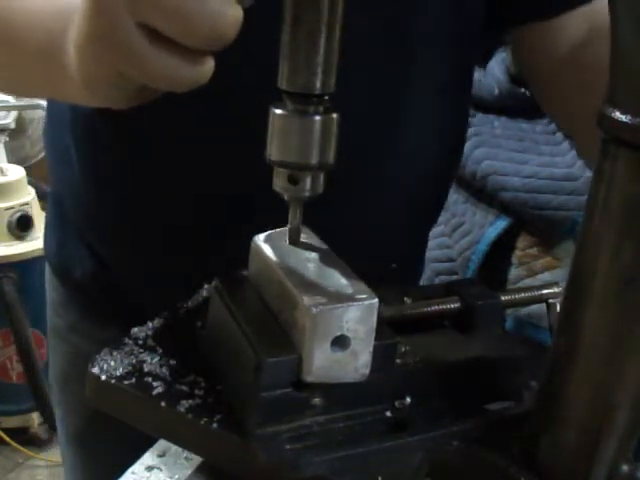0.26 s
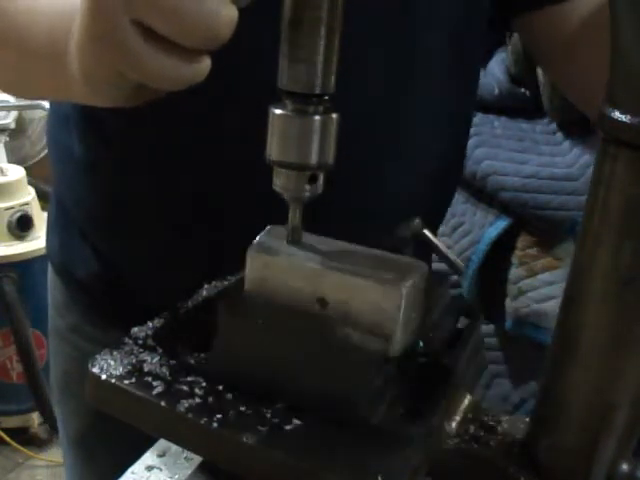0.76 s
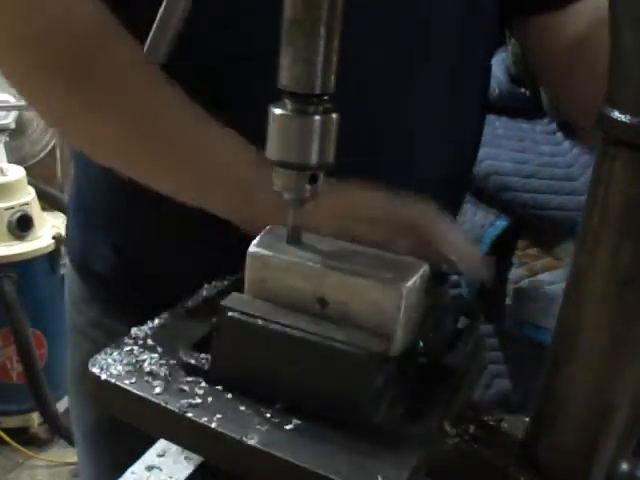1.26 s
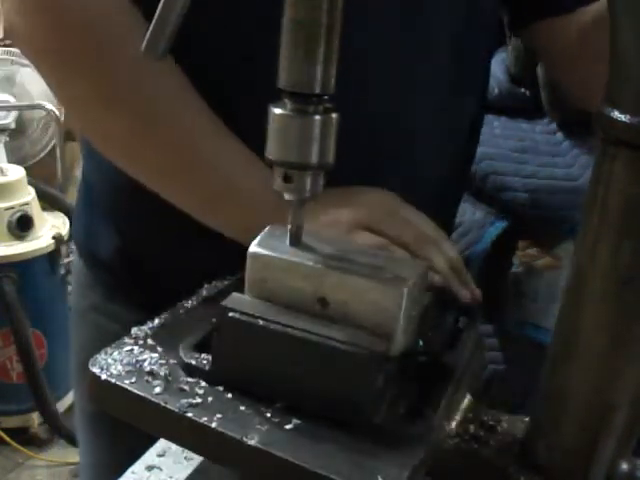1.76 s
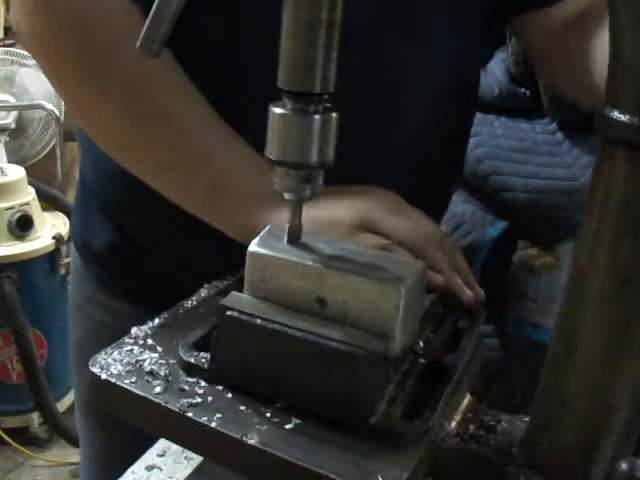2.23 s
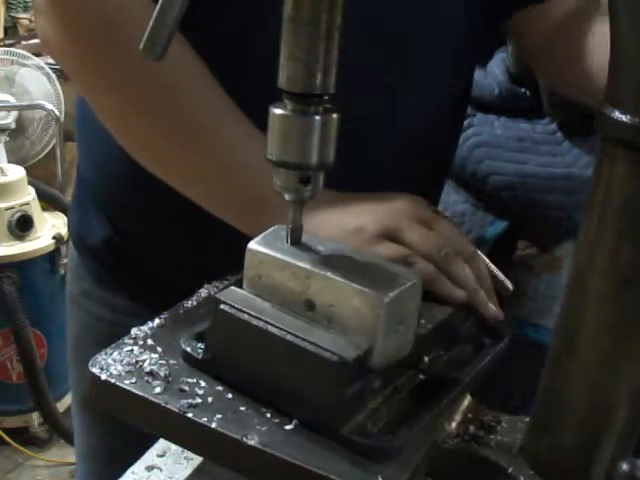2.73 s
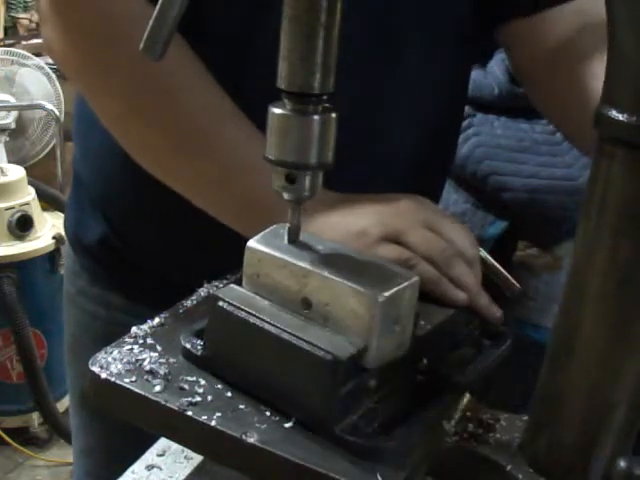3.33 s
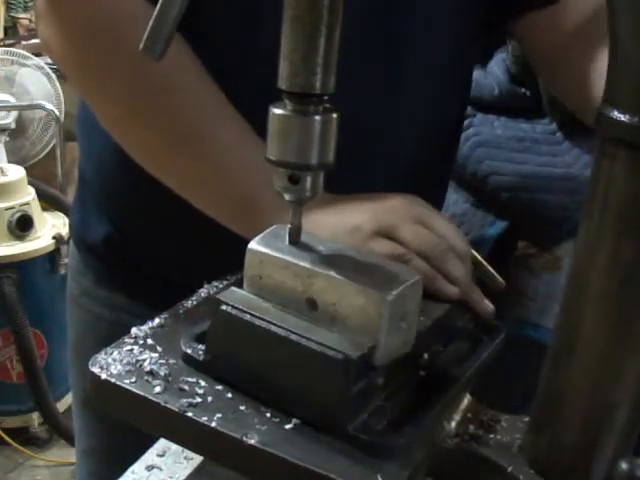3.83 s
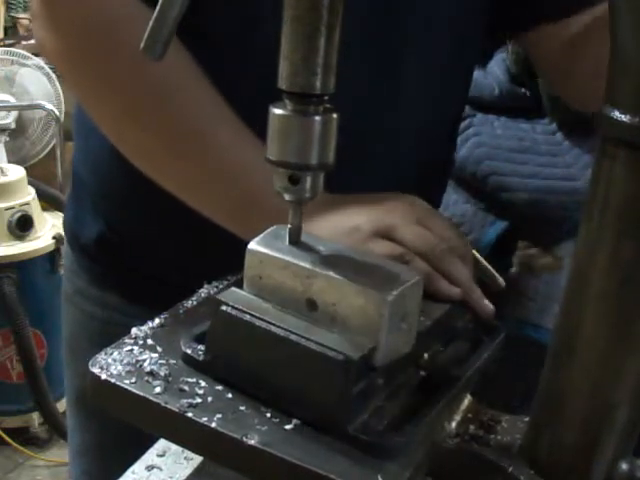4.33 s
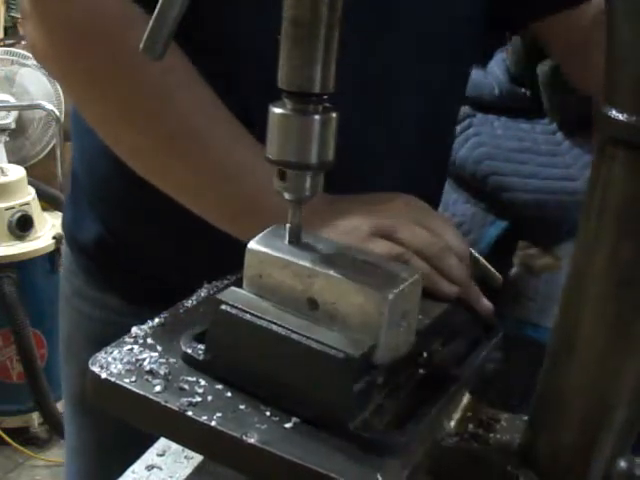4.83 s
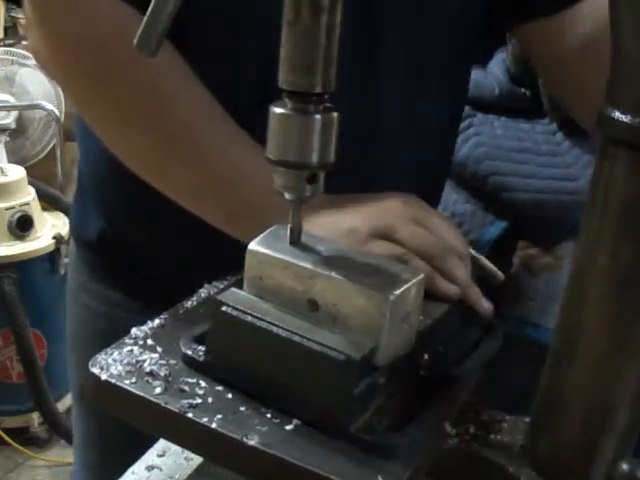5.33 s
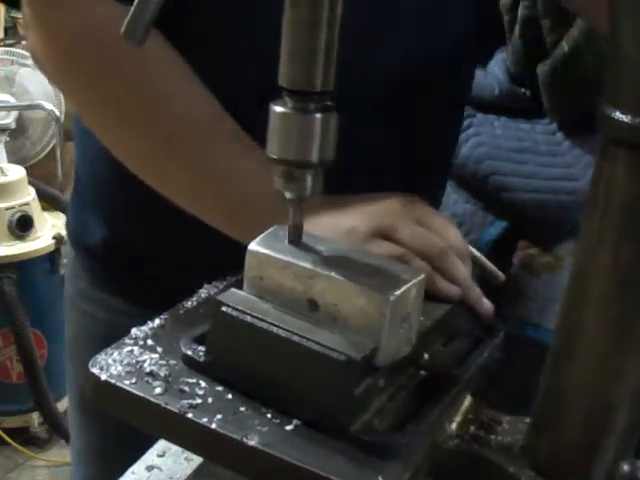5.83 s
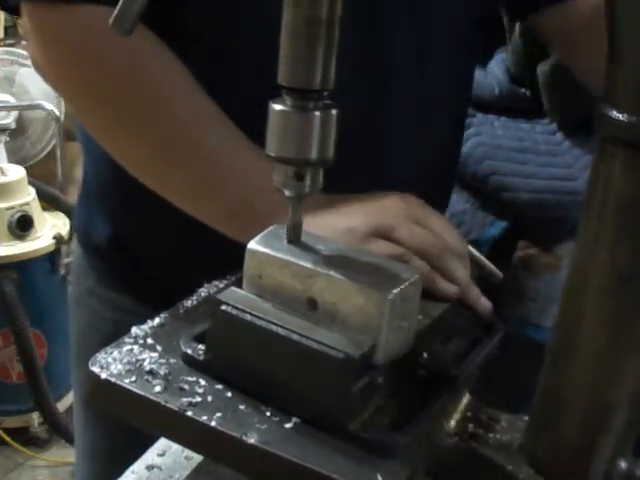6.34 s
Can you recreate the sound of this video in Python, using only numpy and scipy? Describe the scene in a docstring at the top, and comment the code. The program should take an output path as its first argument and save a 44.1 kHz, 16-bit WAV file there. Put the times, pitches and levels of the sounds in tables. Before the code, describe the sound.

A thread tap cuts into a metal block in four short hand-turned pulls, one early and three near the end, each a quick run of dry clicks over a rough rub and a thin ring. Before and between them a vise slides on an iron table, the drill press knocks, and a few chips snap. The sound is close, with a short workshop echo, soft room hiss and a faint high ticking.

```python
"""A thread tap in a drill press, turned by hand into a metal block, close to one microphone.
Each pull makes the drive chatter notch by notch over the rub of the cut, and the tap sings thinly.
Knocks sound at the machine, the vise slides and scuffs on the iron table, and chips snap.
Behind it lies a quiet workshop, with a short echo and soft hiss as the hands shift.
A faint high tick, about sixty a second, runs under everything."""
import sys
import numpy as np
from scipy import signal
from scipy.io import wavfile
from scipy.ndimage import uniform_filter1d

SR = 44100
rng = np.random.default_rng(int(sys.argv[2]) if len(sys.argv) > 2 else 0)


def store_pcm(level_fs):
    """Save levels as 16-bit WAV."""
    pcm = np.round(np.clip(level_fs, -1, 1) * 32767).astype(np.int16)
    wavfile.write(sys.argv[1], SR, np.atleast_2d(pcm).T)


N = 290610

# The force of the cut, one table a pull. Each row: time in seconds, level of the press column in dB,
# middle and treble in dB against it.
PULL_LEVELS = [
    [(1.69, -69, 4, 6), (1.7, -56, -2, -15), (1.72, -49, -6, -26), (1.734, -45, -3, -11),
     (1.746, -42, -15, -13.5), (1.834, -41, -5, -12), (1.838, -38, -7, -8), (1.95, -38, -3.5, -16),
     (1.966, -39, -4, -22), (1.982, -43.5, -6, -16), (2.008, -41.5, -6, -19), (2.016, -39.5, -21, -26),
     (2.042, -59, -9, -27), (2.06, -61, 0, -23)],
    [(4.675, -51, -1, -18), (4.699, -40, -11, -13), (4.741, -57, 7, -6), (4.759, -41, -5, -14),
     (4.773, -54, -8, 0), (4.779, -40, -5.5, -13), (4.885, -38, -7.5, -10), (4.961, -40.5, -2.5, -15),
     (4.985, -33.5, -6, -13), (4.995, -45.5, 5, 1), (5.015, -35.5, -8.5, -22), (5.163, -38.5, -8.5, -21),
     (5.191, -39, -21, -24), (5.197, -59, -12, -10), (5.207, -44, -5, -25), (5.245, -53, 9, 3),
     (5.251, -64, -8, -8), (5.27, -67, 25, 5)],
    [(5.5, -25, -12, -14), (5.512, -43, -3, -11), (5.53, -40.5, -12, -17), (5.548, -52, -8, -20),
     (5.556, -42, -5, -14.5), (5.75, -31.5, -1, -6.5), (5.768, -24.5, -5, -15), (5.796, -37, -5, -13),
     (5.812, -24, -13, -25), (5.838, -34.5, -2.5, -11), (5.848, -40, 4, -9), (5.858, -32, -11, -22),
     (5.884, -29, 0.5, -12), (5.892, -24.5, -4, -18.5), (5.952, -32.5, -5.5, -23), (5.958, -33.5, 4, -11.5),
     (5.976, -27.5, -5, -20), (6.012, -31.5, -7, -18), (6.038, -28.5, -11, -33), (6.104, -41.5, -16, -31),
     (6.118, -42.5, -5.5, -18), (6.182, -46, -14, -30), (6.224, -43, -5.5, -8), (6.258, -50, -20, -33),
     (6.268, -36, -16, -29), (6.31, -70, -18, -29)],
    [(6.322, -54, -8, -12), (6.34, -37, -20, -24), (6.354, -46, -3, -17), (6.386, -33.5, -10, -29),
     (6.438, -27.5, -11.5, -24.5), (6.456, -33.5, 3, -7.5), (6.492, -26.5, -9.5, -22),
     (6.496, -29.5, 1, -8.5), (6.56, -30, 3, -3), (6.59, -32, 0, -17)],
]
# How the cut bites. Each row: time in seconds, favoured ring of column, middle and treble in Hz,
# crispness of the notches from 0 to 1.
CUT_BITE = [(1.73, 950, 1900, 4000, .75), (1.8, 950, 3000, 5200, .75), (1.87, 880, 3300, 4100, .8),
            (1.9, 850, 2400, 5300, .7), (1.94, 950, 2700, 4200, .75), (2.02, 880, 3100, 4000, .6),
            (4.72, 620, 2900, 4100, .3), (4.82, 700, 2900, 4000, .35), (4.9, 780, 2200, 4300, .35),
            (4.935, 800, 3100, 5200, .7), (5.0, 850, 3200, 4600, .85), (5.2, 850, 3200, 4400, .95),
            (5.55, 830, 2100, 4100, .5), (5.66, 850, 2000, 4100, .7), (5.74, 900, 2400, 4300, .8),
            (5.79, 820, 3000, 4200, .7), (5.915, 900, 3000, 4100, .85), (5.935, 830, 2250, 4000, .8),
            (6.05, 820, 2100, 4000, .7), (6.2, 820, 2900, 4200, .5), (6.36, 810, 2300, 4300, .35),
            (6.45, 810, 2300, 4800, .55), (6.5, 900, 2300, 4300, .75), (6.515, 950, 3250, 4300, .8),
            (6.54, 1030, 3250, 4300, .8), (6.55, 1040, 2300, 4300, .8)]
# The favoured rings of column, middle and treble. Each row: width in Hz, level in dB against the rest.
FAVOURED_RINGS = [(130, -2.), (450, -1.), (550, -3.)]


def pulls(press):
    """The cut jolts and rubs the press in five zones of pitch: rumble, column, middle, treble, top."""
    t = np.arange(N) / SR
    column_hz, middle_hz, treble_hz, crispness = curves(CUT_BITE)
    jolts = notch_jolts(press)
    jolts[2] = favour(jolts[2], middle_hz, *FAVOURED_RINGS[1])
    jolts[3] = favour(jolts[3], treble_hz, *FAVOURED_RINGS[2])
    # the jolts' share of the power: the lower zones follow the bite, the upper two are mostly notches
    share = np.r_[np.outer([.5, .85, 1.05], crispness), np.outer([.8, .65], np.ones(N))].clip(0, .95)
    rubbing = rub(press, slips_per_s=3000, spread_db=2.8, shifts_per_s=9)
    zones = np.sqrt(share) * jolts + np.sqrt(1 - share) * rubbing
    zones[1] = favour(zones[1], column_hz, *FAVOURED_RINGS[0])  # rings with rub and jolts alike
    column, middle, treble = curves(np.concatenate(PULL_LEVELS))
    rumble_db = -45 + 0.52 * (column + 40)
    top_db = -66 + 0.84 * (column + treble + 50)
    gains = gain_of([rumble_db, column, column + middle, column + treble, top_db])
    fade = sum(gate(rows[0][0], rows[-1][0] + 0.02, t, fade_s=0.01) for rows in PULL_LEVELS)
    return fade * ((gains * zones).sum(0) + tap_ring(zones[3]))


# How far the drive has turned, one table a pull. Each row: time in seconds, notches passed.
DRIVE_TURN = [
    [(1.705, -1), (1.736, 0), (1.783, 2), (1.821, 4), (1.89, 8), (1.962, 12), (2.013, 14)],
    [(4.752, 0), (4.797, 2), (4.85, 5), (4.936, 11), (5.024, 17), (5.08, 20), (5.127, 22), (5.159, 23),
     (5.198, 24)],
    [(5.551, 0), (5.619, 3), (5.665, 6), (5.722, 11), (5.806, 20), (5.875, 27), (5.934, 32), (6.015, 38),
     (6.068, 41), (6.139, 44)],
    [(6.359, 0), (6.399, 2), (6.443, 5), (6.499, 10), (6.542, 15), (6.586, 20)],
]
# The click of a notch in middle and treble. Each row: lower and upper band edge in Hz.
CLICK_BANDS = [
    [1500, 3500],
    [3500, 5500],
]


def notch_jolts(press):
    """Each passing notch jolts the press: a dry click within a short grind of contacts."""
    starts, t = [], np.arange(4096) / SR
    for rows in DRIVE_TURN:
        s, passed = np.transpose(rows)
        starts.extend(np.interp(np.arange(passed[0], passed[-1] + 1), passed, s))
    rings = blows(press, spread_db=1.7, count=len(starts))
    rings *= np.exp(-np.outer([5, 18, 46, 86, 170], t))  # the grip damps them
    grind = rng.standard_normal((len(starts), 1, 500)) * np.exp(-t[:500] / .0018)
    rings[:, 2:, :2048] = peaked(signal.fftconvolve(rings[:, 2:, :1549], grind ** 3, axes=2))
    rings[:, 2:, 2048:] = 0
    for k, edges_hz in enumerate(CLICK_BANDS, start=2):
        band = signal.butter(4, edges_hz, "bandpass", fs=SR, output="sos")
        rings[:, k] += gain_of(-4) * peaked(signal.sosfilt(band, signal.unit_impulse(4096, 50)))
    jolts = np.zeros((5, N))
    sizes = gain_of(1.4 * rng.standard_normal((len(starts), 5)))  # nearly even
    for start, ring, size in zip(starts, rings, sizes):
        for k in range(5):
            add(jolts[k], start - .0015, size[k] * ring[k])
    return jolts / np.sqrt(running_power(jolts) + 0.13)


# The thin ring of the tap, one table a pull. Each row: time in seconds, level in dB.
TAP_LEVELS = [
    [(1.72, -72), (1.738, -64), (1.76, -71), (1.868, -59), (1.99, -69), (2.04, -80)],
    [(4.72, -69), (4.904, -59), (4.97, -66), (4.984, -58), (5.162, -70), (5.22, -83)],
    [(5.56, -70), (5.696, -49), (5.752, -47), (5.794, -56), (5.986, -59), (6.1, -74)],
    [(6.38, -73), (6.42, -69), (6.454, -53), (6.474, -57), (6.564, -43), (6.59, -48)],
]


def tap_ring(drive):
    """The cut keeps one narrow mode of the tap singing."""
    ring = resonate(drive, hz=np.full(N, 4400), width_hz=16)
    db, = curves(np.concatenate(TAP_LEVELS))
    return gain_of(db) * ring / np.sqrt(running_power(ring))


# Clear modes of the press. Each row: pitch in Hz, width in Hz, relative strength in dB.
PRESS_MODES = [(91.8, 32, -14), (195.3, 40, -11), (249.6, 34.5, -8.5), (813, 120, 4.5), (1051, 47, 2.5),
               (629, 68, -1.5), (493, 182, 9.5), (1418, 37, -22), (1906, 100, -7.5), (2246, 62, -11.5),
               (2483, 93, -20), (2880, 147, -21), (3227, 150, -13), (3950, 160, -25), (10240, 38, -45)]
# Its many small modes. Each row: frequency in Hz, relative strength in dB.
PRESS_SMALL_MODES = [(35, -62), (60, -35), (242, -18), (400, -9.5), (543, 7), (800, -4), (1100, -0.5),
                     (1300, -7), (2900, -13), (3500, -24.5), (11000, -57), (14300, -85), (22000, -120)]


def drill_press():
    """The column and table of the press, which ring under both the cut and the knocks."""
    return metal_body(PRESS_MODES, PRESS_SMALL_MODES, borders_hz=[400, 1300, 3600, 6500],
                      small_db=-4.5, width_at_1khz=141, rise_cycles=3, count=140)


# Knocks at the machine, among them a few harder jolts of the drive's notches. Each row: start in seconds,
# column level in dB, rumble, middle and treble in dB against it, favoured ring in Hz, damping factor.
KNOCKS = [(0.0699, -37, -3.5, -6.5, 0, 3390, 1.07), (0.289, -30.5, -7.5, -6, -22, 1400, 0.62),
          (0.331, -36, -30, -25, -34, 1430, 2.3), (0.837, -38.5, -30, -0.5, -6, 2010, 0.74),
          (1.059, -57, -23, 11, 4.5, 2210, 1.1), (1.353, -31.5, -14.5, -10.5, -20, 1860, 0.73),
          (1.823, -34.5, -18, -14, -9, 2200, 3.8), (2.082, -27, -32, 6.5, 1.5, 3200, 1.2),
          (2.0985, -28.5, -22, 3.5, -2, 2500, 2.3), (2.1005, -30.5, -20, 13.5, -9, 2300, 1.74),
          (2.105, -32, -10, -1.5, -15, 1750, 0.61), (2.131, -49, -13, 0, -18, 2300, 2.5),
          (2.185, -41, -20, -14, -25, 1900, 1.6), (2.421, -40, -3, -8, 4, 3950, 2.6),
          (2.544, -34.5, -10.5, -6, -2, 2900, 1.2), (2.566, -35, -29, -1.5, -0.5, 2950, 0.65),
          (2.644, -29.5, -7.5, -3.5, -16, 2930, 0.86), (2.918, -32.5, -18, -17, -32, 1890, 1.6),
          (3.303, -47, -26, -3, -22.5, 2170, 0.98), (3.33, -45, -8, -13, -24, 1380, 1.3),
          (3.52, -42, -14, -20, -30, 1500, 1.3), (3.566, -27, -10.5, -3, -34, 1400, 0.34),
          (3.604, -33.5, -19, -18, -33, 1910, 2.6), (3.654, -34.5, -3.5, -7, -18, 2070, 1.1),
          (3.666, -42.5, -8, 2.5, -10, 2500, 0.91), (3.67, -31, -12, -6, -12, 2700, 3.8),
          (3.678, -38.5, -30, 3, -4, 2520, 1.3), (3.698, -53, -12, 12, 6, 2430, 1.9),
          (4.1394, -50, -3, 14, 15, 2900, 2.8), (4.286, -31, -16, -7.5, -42, 1470, 0.4),
          (4.32, -35.5, -14, -7, -18, 2320, 1.55), (4.65, -30, -25, -2.5, -16.5, 2060, 0.99),
          (4.9966, -49, 4.5, 11.5, 5, 3200, 1.6), (5.127, -37, -11, -9, -18, 3160, 1.4),
          (5.333, -39, -37, 5, -5, 1910, 0.4), (5.479, -31, -24, -5.5, -22, 2190, 1.9),
          (5.679, -30, -4.5, 3, -7, 2300, 1.6)]


def knocks(press):
    """Each knock is a short crunch of contacts that rings the press; clear modes linger."""
    out, t, rows = np.zeros(N), np.arange(4096) / SR, np.array(KNOCKS)
    favoured_hz, dampings = rows[:, 5:].T
    _, borders_hz, _ = press
    rings = blows(press, spread_db=2.5, count=len(rows))
    envelope = np.exp(-np.pi * 200 * t) - np.exp(-t / 0.00048)
    favoured = np.sin(2 * np.pi * np.outer(favoured_hz, t)) * envelope
    rings[np.arange(len(rows)), np.searchsorted(borders_hz, favoured_hz)] += peaked(favoured)
    rings = peaked(rings)
    for zone, mode, db in [(0, 1, -1), (1, 3, 4.5)]:  # every blow finds the main modes of table and column
        hz, width_hz, _ = PRESS_MODES[mode]
        rise = 1 - np.exp(-t * hz / 1.6)
        rings[:, zone] += gain_of(db) * peaked(dying_sine(hz, width_hz, t) * rise)
    crunch = rng.standard_normal((len(rows), 400)) * (rng.random((len(rows), 400)) < .06)
    crunch[:, 0] = 1.32  # a firm first contact
    crunch *= np.exp(-np.outer(np.maximum(dampings, 1.1), t[:400]) / 0.0054)
    clear_hz = np.array([PRESS_MODES[k][0] for k in (7, 8, 10, 11)])
    for (s, db, rumble, middle, treble, hz, damping), ring, contacts in zip(rows, rings, crunch):
        decay = np.exp(-np.outer([3.3, 67, 960, 1500, 61], t) * np.clip(damping - .6, .25, 8))
        gains = gain_of(db + np.array([rumble, 0, middle, treble, treble - 16.5]))
        zones = gains[:, None] * peaked(signal.oaconvolve(ring * decay, contacts[None], axes=1))
        add(out, s - .001, zones[1:].sum(0))
        add(out, s + 0.00612, zones[0])  # the heavy table answers late
        octaves_away = abs(np.log2(clear_hz / hz))
        linger = gain_of(-11 * octaves_away) @ dying_sine(clear_hz[:, None], 47 * damping, t)
        add(out, s, gain_of(db + middle - 7) * linger * np.minimum(t / 0.0027, 1))
    return out


# Clear modes of the vise. Each row: pitch in Hz, width in Hz, relative strength in dB.
VISE_MODES = [(198, 80, -1), (358, 28, -14.5), (747, 210, 1), (1400, 200, -1), (1910, 110, -19),
              (2300, 240, 2), (2750, 110, -2.5), (3390, 95, -12), (3740, 54, -12), (4900, 62, -22),
              (5630, 44, -17), (6640, 61, -16), (7830, 210, -29)]
# Its many small modes. Each row: frequency in Hz, relative strength in dB.
VISE_SMALL_MODES = [(35, -60), (60, -39), (351, -18.5), (456, -16.5), (753, -11.5), (1390, -4), (2550, -18),
                    (2780, -1), (3240, -12), (4800, -13), (6500, -28.5), (9000, -33.5), (11000, -52),
                    (14300, -73), (22000, -120)]


def vise_body():
    """The metal of the vise, which rings when it is rubbed."""
    return metal_body(VISE_MODES, VISE_SMALL_MODES, borders_hz=[400, 1050, 2000, 4000],
                      small_db=-2.7, width_at_1khz=192, rise_cycles=2.5, count=180)


# The vise on the move, one table a slide. Each row: time in seconds, strength in dB, brightness in dB.
VISE_SLIDES = [
    [(0.4, -48, -14), (0.454, -44.5, 3), (0.52, -36, 1.5), (0.6, -24.5, -6.5), (0.636, -24.5, -2.5),
     (0.648, -19, -3), (0.7, -25.5, -5.5), (0.745, -32.5, -7), (0.775, -55, 1), (0.81, -64, -10)],
    [(1.4, -51, -6), (1.404, -41, -1), (1.422, -36.5, -11), (1.434, -44.5, -1), (1.448, -45.5, -7),
     (1.49, -60, 2)],
    [(2.14, -47, -2), (2.166, -51, 8), (2.298, -40.5, -4.5), (2.346, -36.5, -1), (2.474, -39.5, 1.5),
     (2.496, -35, -6), (2.53, -50, -5)],
    [(3.27, -52, -10), (3.3, -43, -9), (3.345, -49.5, -1), (3.38, -85, -2)],
]
# How its zones answer, low to high. Each row: offset in dB, dB per dB of strength and of brightness.
SLIDE_RESPONSE = [(-12, 0.41, -0.026), (-3.5, 0.7, -0.51), (-3.5, 0.97, -0.0016), (-5, 0.93, 0.45),
                  (-14, 0.95, 0.53)]


def vise_slides(vise):
    """The vise scuffs over the iron table in tiny slips, silent between slides."""
    t, gains = np.arange(N) / SR, np.zeros((5, N))
    offset_db, follows, brightens = np.transpose(SLIDE_RESPONSE)[:, :, None]
    for rows in VISE_SLIDES:
        strength, brightness = curves(rows)
        db = offset_db - 40.5 + follows * (strength + 39.5) + brightens * brightness
        gains += gate(rows[0][0], rows[-1][0] + 0.0069, t, fade_s=0.04) * gain_of(db)
    return (gains * rub(vise, slips_per_s=2500, spread_db=1.5, shifts_per_s=16)).sum(0)


# Chips breaking at the cut. Each row: start in seconds, level in dB, pitch in Hz,
# cycles to die to about a third.
CHIP_SNAPS = [(0.0689, -21, 3800, .6), (0.0695, -12.5, 3600, 0.52), (2.42, -16.5, 4060, 1.8),
              (2.4211, -12.5, 6130, 0.53), (4.1383, -16.5, 3080, 1.2), (4.994, -29, 4800, 1.2),
              (5.8473, -14, 5500, 1.3), (5.8485, -25, 7000, 0.98)]


def chip_snaps():
    """A snapping chip is a hard pulse: a sine that starts at once and dies in a cycle or two."""
    out, t = np.zeros(N), np.arange(200) / SR
    for s, db, hz, cycles in CHIP_SNAPS:
        add(out, s, gain_of(db) * np.sin(2 * np.pi * hz * t) * np.exp(-t * hz / cycles))
    return out


# Hands shifting at the machine. Each row: peak time in seconds, peak in dB, rise and fall in dB a second.
HAND_SWELLS = [(0.074, -43.5, 225, 85), (.84, -56.5, 898, 51), (1.08, -58.5, 113, 58), (3.1, -53.5, 66, 55),
               (4.138, -47, 79, 119), (4.32, -57, 155, 150)]
# The colour of their hiss. Each row: frequency in Hz, relative level in dB.
HAND_COLOUR = [(150, -37), (700, 3.5), (2000, -4.5), (4500, -5.5), (7500, -12.5), (11000, -24)]
# Faint squeaks in it. Each row: start and length in seconds, pitch and width in Hz, level in dB.
HAND_SQUEAKS = [(0.054, 0.076, 2055, 40.4, -46.5), (2.202, 0.1, 6270, 60, -67),
                (4.009, 0.33, 2126, 50, -56.5), (4.233, 0.25, 2320, 95, -52.5)]


def hands():
    """Shifting hands make soft swells of broad noise, with narrow fuzzy squeaks."""
    t, gain = np.arange(N) / SR, np.zeros(N)
    for s, db, rise, fall in HAND_SWELLS:
        gain += gain_of(db + np.minimum(rise * (t - s), fall * (s - t)))
    out = gain * noise(HAND_COLOUR, patchy_db=4.4)
    for s, length, hz, width_hz, db in HAND_SQUEAKS:
        size = round(length * SR)
        pole = np.exp(-np.pi * width_hz / SR)
        drift = signal.lfilter([1], [1, -pole], rng.standard_normal((2, SR)))[:, -size:]
        tone = ((drift[0] + 1j * drift[1]) * np.exp(2j * np.pi * hz * t[:size])).real
        add(out, s, gain_of(db) * unit_rms(tone) * signal.windows.tukey(size, .6))
    return out


def ticking(db=-45, per_s=59.94):
    """A faint regular tick in the treble, every second one weaker, sizes uneven."""
    train, starts = np.zeros(N), np.arange(.0268, N / SR, 1 / per_s)
    uneven_db = 3 * rng.standard_normal(len(starts)) - 3.1 * (np.arange(len(starts)) % 2)
    train[(starts * SR).astype(int)] = gain_of(db + uneven_db)
    return np.convolve(train, dying_sine(hz=5040, width_hz=1070, t=np.arange(128) / SR))[:N]


def workshop_echo(x, t60_s):
    """The room returns sparse, dulled echoes of random sign that die away."""
    echoes = np.zeros(SR // 2)
    at = np.arange(200, len(echoes) - 20, 20)
    sizes = rng.choice([-1., 1.], len(at)) * gain_of(-60 * at / SR / t60_s)
    echoes[at + rng.integers(0, 20, len(at))] = sizes
    echoes = signal.lfilter([1], [1, -.6], echoes)
    return signal.oaconvolve(x, echoes / np.linalg.norm(echoes))[:N]


# The quiet workshop around the microphone. Each row: frequency in Hz, relative level in dB.
ROOM_COLOUR = [(15, -41), (25, -10.5), (153, -16), (178, -5.5), (364, -6), (403, -2), (446, -4.5),
               (591, -4), (1010, -9), (1090, -8.5), (2060, -11.5), (2230, -10.5), (2530, -13), (4790, -19),
               (11100, -33.5), (14400, -55), (22000, -120)]


def room_tone():
    """The room hisses softly behind the work."""
    return gain_of(-51.5) * noise(ROOM_COLOUR, patchy_db=1.58)


def metal_body(clear, small, borders_hz, small_db, width_at_1khz, rise_cycles, count):
    """A metal part: its modes as dying complex tones, the borders of its zones, the zone of each mode."""
    small_hz = np.geomspace(120, 11000, count) * rng.uniform(0.99, 1.03, count)
    hz, width, db = np.transpose(clear)
    hz = np.r_[hz, small_hz]
    db = np.r_[db, spectrum_at(small, small_hz) + small_db]
    width = np.r_[width, width_at_1khz * np.sqrt(small_hz / 1000)]  # high modes lose energy faster
    t = np.arange(4096) / SR
    tones = np.exp(np.outer(2j * np.pi * hz - np.pi * width, t))
    rise = (1 - np.exp(-np.outer(hz, t) / rise_cycles)) ** 2  # low modes take longer to build up
    return (gain_of(db) * width)[:, None] * tones * rise, borders_hz, np.searchsorted(borders_hz, hz)


def blows(part, spread_db, count):
    """One ring a blow and zone: each blow meets the modes with its own strengths and phases."""
    tones, _, zone = part
    chance = rng.standard_normal((count, 2, len(zone)))
    weight = gain_of(spread_db * chance[:, 0]) * np.exp(2j * np.pi * chance[:, 1])
    rings = [(weight[:, zone == k] @ tones[zone == k]).real for k in range(5)]
    return peaked(np.stack(rings, axis=1))


def rub(part, slips_per_s, spread_db, shifts_per_s, spots=6):
    """Tiny uneven slips ring the part; the contact wanders, so the colour shifts. Zones of rms 1."""
    rings = blows(part, spread_db, count=spots)
    slips = np.minimum(rng.exponential(1, N), 5) * (rng.random(N) < slips_per_s / SR)
    slips *= rng.choice([-1, 1], N)
    place = np.arange(N) / SR * shifts_per_s % spots
    apart = (place - np.arange(spots)[:, None] + 1) % spots - 1
    slips = slips * np.cos(np.pi / 2 * np.clip(apart, -1, 1))  # each spot fades into the next
    return np.array([unit_rms(signal.oaconvolve(slips, rings[:, k], axes=1).sum(0)[:N]) for k in range(5)])


def favour(x, hz, width_hz, db):
    """Adds a moving ring to x at a steady level against it."""
    ring = resonate(x, hz, width_hz)
    ring *= np.sqrt(running_power(x) / running_power(ring))
    return (x + gain_of(db) * ring) / np.sqrt(1 + gain_of(2 * db))


def resonate(x, hz, width_hz):
    """A moving resonance: shifts the curve hz down to zero, smooths, and shifts back."""
    turn = np.exp(2j * np.pi * np.cumsum(hz) / SR)
    pole = np.exp(-np.pi * width_hz / SR)
    return 2 * (turn * signal.lfilter([1 - pole], [1, -pole], x / turn)).real


def noise(colour, patchy_db):
    """Steady noise of a given colour with drifting patches."""
    frames, hz = N // 256 + 5, np.fft.rfftfreq(1024, 1 / SR)
    real, imag, patches = rng.standard_normal((frames, 513, 3)).T
    patches = unit_rms(uniform_filter1d(uniform_filter1d(patches, 14, 0), 12, 1))
    spectra = (real + 1j * imag) * gain_of(spectrum_at(colour, hz)[:, None] + patchy_db * patches)
    return unit_rms(signal.istft(spectra, nperseg=1024, noverlap=768)[1][:N])


def dying_sine(hz, width_hz, t):
    """One struck mode: the wider, the sooner it dies."""
    return np.sin(2 * np.pi * hz * t) * np.exp(-np.pi * width_hz * t)


def curves(rows):
    """Draws each column after the time as a line through the scene."""
    s, *columns = np.transpose(rows)
    return [np.interp(np.arange(N) / SR, s, column) for column in columns]


def gate(start_s, end_s, t, fade_s):
    """Fades in from the start and out towards the end."""
    return np.clip(np.minimum(t - start_s, end_s - t) / fade_s, 0, 1)


def spectrum_at(points, hz):
    """Reads a spectrum on a log frequency axis."""
    point_hz, db = np.transpose(points)
    return np.interp(np.log(hz + 1), np.log(point_hz + 1), db)


def gain_of(db):
    """Decibels to gain."""
    return 10 ** (np.asarray(db) / 20)


def unit_rms(x):
    """Scales to rms 1."""
    return x / np.sqrt(np.mean(x ** 2) + 1e-20)


def peaked(rings):
    """Scales each ring to a short-time peak rms of 1."""
    return rings / np.sqrt(uniform_filter1d(rings ** 2, size=180).max(-1, keepdims=True))


def running_power(x):
    """Mean power over a tenth of a second."""
    return abs(uniform_filter1d(x ** 2, size=4410)) + 1e-12


def add(mix, s, sound):
    """Mixes a sound in at s seconds."""
    part = mix[round(s * SR):][:len(sound)]
    part += sound[:len(part)]


def scene():
    """Press and vise close up in the workshop, over hiss and a faint tick, in mono."""
    press, vise = drill_press(), vise_body()
    near = pulls(press) + knocks(press) + chip_snaps() + vise_slides(vise)
    background = room_tone() + hands() + ticking()
    return (near + gain_of(-12.5) * workshop_echo(near, t60_s=0.22) + background)[None]


def record(dry):
    """The microphone drops the deep bass, and the highest treble is cut off."""
    low_cut = signal.butter(3, 62, "highpass", fs=SR, output="sos")
    high_cut = signal.firwin(511, 11050, window=("kaiser", 9), fs=SR)
    return signal.oaconvolve(signal.sosfilt(low_cut, dry), high_cut[None], "same")


dry = scene()
out = record(dry)
store_pcm(out)
```